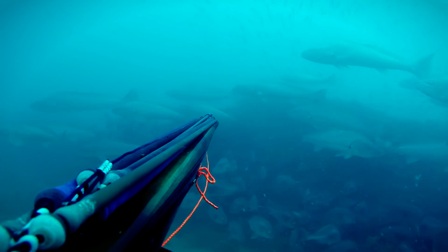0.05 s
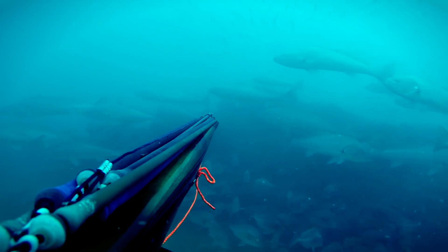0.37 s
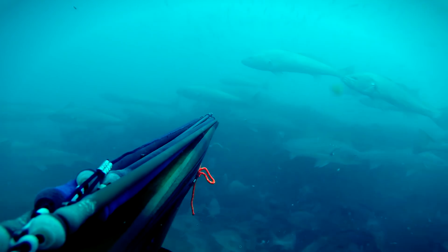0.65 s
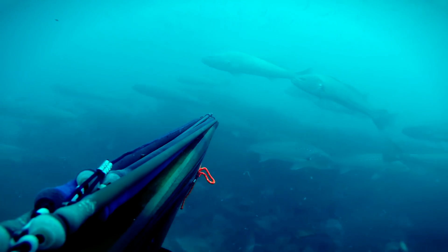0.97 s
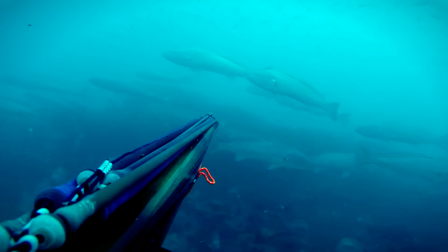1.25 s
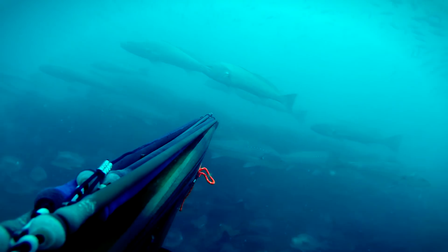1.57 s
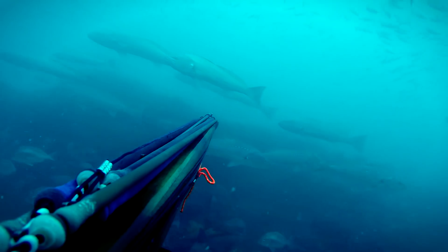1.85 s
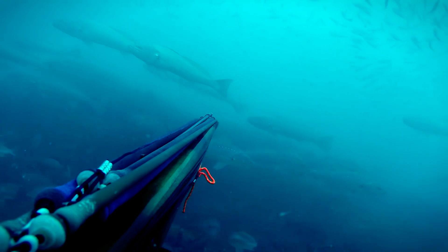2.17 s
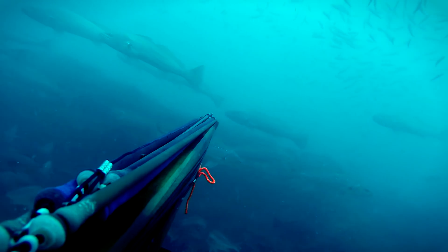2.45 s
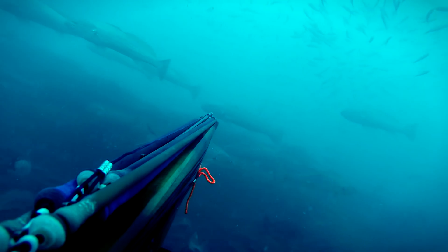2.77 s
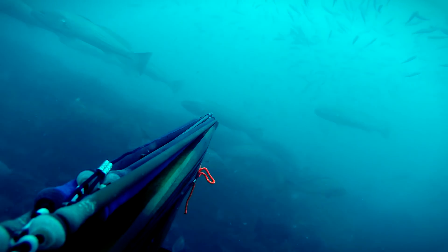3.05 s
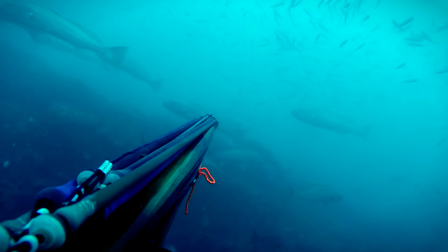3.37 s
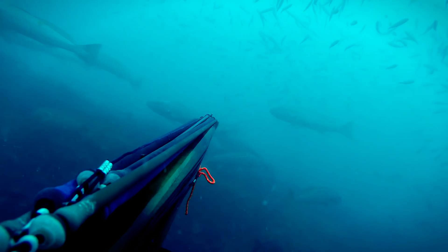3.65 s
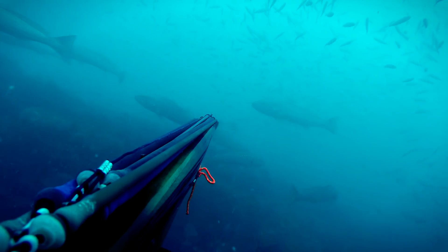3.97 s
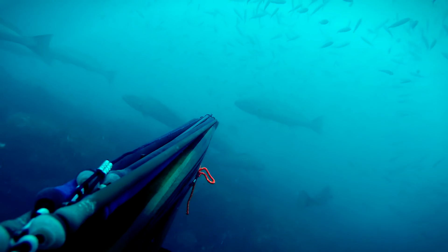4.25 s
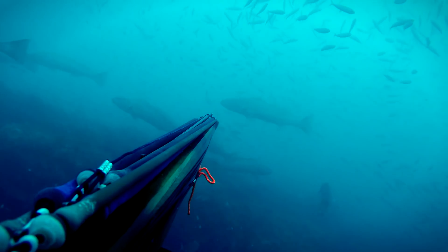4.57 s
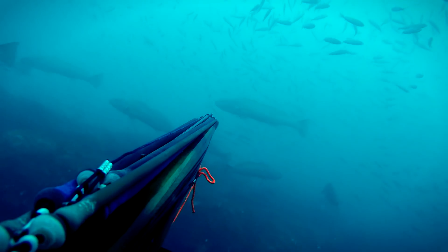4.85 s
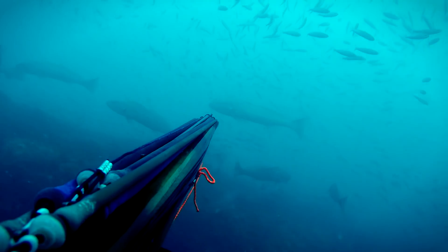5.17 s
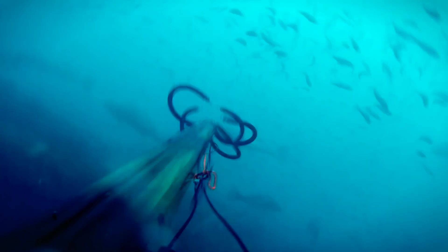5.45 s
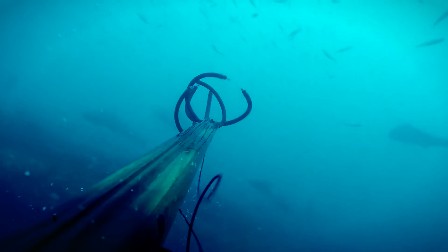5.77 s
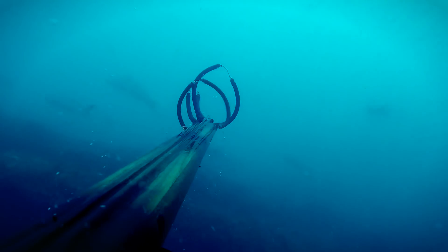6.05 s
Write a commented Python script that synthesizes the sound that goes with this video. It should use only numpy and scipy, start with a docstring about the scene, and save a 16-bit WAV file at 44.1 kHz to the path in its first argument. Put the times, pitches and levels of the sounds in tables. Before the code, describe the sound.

Faint underwater wash with tiny shrimp clicks, then a speargun fires with one loud crack and a brief rattle.

```python
"""Speargun shot under water

Heard from a camera housing on the gun: snapping shrimp crackle over a low wash; the gun knocks and
creaks in the hand. The trigger lets go, the rubber bands slam forward, the shaft rattles out and the
line snaps off its clip. The shot overloads the camera, whose gain control ducks and slowly recovers."""
import sys
import numpy as np
from scipy import signal
from scipy.fft import rfft, irfft
from scipy.io import wavfile
from scipy.ndimage import map_coordinates

SR = 44100
rng = np.random.default_rng(int(sys.argv[2]) if len(sys.argv) > 2 else 0)


def materialize(psi):
    """Save the field psi as 16-bit PCM at rate SR to the path in sys.argv[1].

    A 1-D psi becomes a single channel; in a 2-D psi each row is a channel.
    """
    bounded = np.clip(np.atleast_2d(psi).T, -1, 1)
    quanta = np.round(bounded * 32767).astype(np.int16)
    wavfile.write(sys.argv[1], SR, quanta)


N = 269451
LAUNCH_S, LAUNCH_RISE_S = 5.432, .012  # shaft starts to move; time to full speed

# spectra of water, distant shrimp, housing, gun contacts, shaft rush, rubber: f/Hz, relative level/dB
WASH_SPECTRUM = [(20, -3), (40, -1), (90, 0), (170, -1.5), (260, -7), (500, -12), (1000, -17.5),
                 (2500, -21.5), (5000, -30), (10000, -43.5), (15000, -34.5)]
REEF_SPECTRUM = [(600, -23.5), (1450, -8), (1850, 6), (2200, -13.5), (2900, -8.5), (3300, 2), (3850, -14.5),
                 (4500, -14), (5500, -6.5), (6400, -17.5), (7500, -9.5), (8500, -21), (9600, -15),
                 (15000, -29)]
HOUSING_SPECTRUM = [(600, -38), (1450, -10.5), (1850, 1.5), (2200, -8.5), (2900, -2), (3400, 6),
                    (3900, -6.5), (4500, -7), (5500, 1), (6400, -5.5), (7500, -1), (8500, -9), (9600, -8),
                    (13000, -13), (15500, -19)]
SCRAPE_SPECTRUM = [(150, -26), (450, -12.5), (800, -7.5), (1700, 5.5), (3400, 4.5), (4300, -10.5),
                   (5600, -2), (7400, -4), (8600, -17.5), (13000, -24), (16000, -29)]
RUSH_SPECTRUM = [(100, -13), (600, -7.5), (1200, -6), (2200, -5.5), (3300, -7), (4200, -17.5), (7000, -26),
                 (9000, -31.5), (16000, -41.5)]
RUBBER_SPECTRUM = [(15, -21), (45, -10.5), (62, 6.5), (76, -8.5), (90, 0), (125, -17), (200, -16),
                   (300, -20.5), (700, -40), (2000, -72.5)]
# nearest shrimp: t/s, housing ring/dB, crack/dB, sizzle/dB, t60/s
NEAR_SNAPS = [(0.0606, -40, -45, -52, 0.019), (0.1176, -52, -53, -57, 0.04), (0.172, -62, -56, -49, 0.006),
              (0.2952, -41, -44, -55, 0.033), (0.3298, -49, -43, -61, 0.017),
              (0.3379, -46, -49, -63, 0.025), (0.3538, -50, -49, -60, 0.022), (0.852, -31, -39, -46, 0.022),
              (0.9595, -47, -44, -45, 0.007), (0.9899, -48, -48, -55, 0.035), (1.049, -47, -46, -63, 0.006),
              (1.252, -62, -58, -55, 0.006), (1.9708, -54, -48, -63, 0.029), (2.382, -44, -51, -72, 0.006),
              (2.5341, -52, -40, -50, 0.006), (2.779, -44, -45, -56, 0.025), (2.8215, -32, -27, -35, 0.006),
              (3.1592, -43, -46, -56, 0.038), (3.1926, -49, -49, -56, 0.016),
              (3.3035, -44, -43, -55, 0.008), (3.4128, -41, -39, -52, 0.017),
              (3.5609, -47, -46, -48, 0.012), (3.712, -47, -43, -54, 0.031), (4.214, -48, -37, -45, 0.009),
              (4.3882, -51, -45, -64, 0.006), (4.7444, -48, -47, -64, 0.011),
              (4.7975, -46, -40, -45, 0.006), (4.847, -54, -47, -59, 0.006), (5.1178, -44, -44, -52, 0.034),
              (5.1886, -46, -49, -53, 0.016)]
# modes of steel and stock: f/Hz, relative level/dB, t60/s
GUN_MODES = [(839, -14.5, 0.37), (930, -11.5, .18), (1145, -12.5, .16), (1333, -7.5, 0.17), (1623, 7.5, .1),
             (1810, -1.5, 0.048), (2290, 2.5, 0.079), (2550, -13, .1), (3150, 6, 0.033), (3350, -3, 0.035),
             (3520, -4, 0.047)]
# grip creaks: t/s, length/s, level/dB
GRIP_CREAKS = [(1.491, .08, -44), (1.725, 0.12, -42)]
# bumps and recoil of the stock: t/s, level/dB, f/Hz, rise/s
STOCK_THUMPS = [(0.492, -33, 86.4, 0.019), (1.434, -43, 470, 0.0046), (1.742, -40, 80, 0.015),
                (2.773, -30.5, 124, 0.0032), (3.469, -35, 312, 0.0033), (5.432, -7, 178, 0.0058),
                (5.435, -14, 395, .003), (5.446, -13.5, 105, 0.0065), (5.467, -9, 52, 0.0079),
                (5.94, -36, 33, .04)]
# hum of the slack bands: f/Hz, level/dB
BAND_HUM = [(63, -27), (88, -24), (224, -27)]
# knocks in the hand while aiming: t/s, level/dB, f/Hz
HAND_KNOCKS = [(0.321, -29, 2530), (0.446, -32, 2550), (1.432, -20, 2485), (1.4371, -31.5, 1186),
               (2.093, -33, 1595), (4.545, -29.5, 2380)]
# trigger release, then bands hitting the muzzle: t/s, level/dB, f/Hz, rise/s, scrape/dB
SHOT_BLOWS = [(5.4154, 6, 1700, 0.00076, -25), (5.416, -3.5, 813, .0012, -36.5),
              (5.4182, 1, 1470, 0.00065, -41), (5.4289, -1.5, 2520, 0.0007, -13.5),
              (5.434, 18, 1572, 0.0018, -1.5), (5.4385, 17, 2103, .0014, -4), (5.445, -9.5, 2510, 0.003, 7)]
# shaft hitting its guide: t/s, level/dB, rise/s, scrape/dB
SHAFT_HITS = [(5.4648, 9, 0.00064, -9), (5.467, 8.5, .0012, -15), (5.472, -1, 0.0015, 7),
              (5.494, 2, 0.0012, -4), (5.5027, 9.5, .0012, -3), (5.5152, -3, 0.0014, 0),
              (5.5283, 2.5, 0.00051, -8), (5.538, -0.5, 0.00055, 1), (5.546, 5, 0.00076, -7),
              (5.5565, 1, .0006, -4), (5.559, -3.5, 0.003, 3), (5.610, -12, .0007, 11)]
# line jerking at its clip: t/s, level/dB, f/Hz, rise/s
LINE_TUGS = [(5.639, -4.5, 2490, 0.00047), (5.6543, -10, 2180, 0.00094), (5.670, -18.5, 2550, 0.0075),
             (5.678, -10, 2640, 0.00097), (5.6912, -3, 2380, .001), (5.6973, 1.5, 2630, 0.00088),
             (5.700, -3.5, 2430, 0.0013), (5.7084, 4.5, 2275, 0.0019), (5.7106, 10.5, 2750, 0.00089),
             (5.7516, -23, 2230, 0.001), (5.797, -28, 1810, 0.0032), (5.828, -26, 3370, 0.002)]


def amp(db):
    return 10 ** (np.asarray(db) / 20)


def unit_rms(x):
    return x / np.sqrt(np.mean(x ** 2) + 1e-20)


def unit_peak(x):
    return x / np.max(np.abs(x))


def wobble(rate_hz):
    """Smooth random curve, rate_hz knots a second."""
    knots = rng.standard_normal(int(N * rate_hz / SR) + 4)
    return map_coordinates(knots, [np.arange(N) * rate_hz / SR])


def coloured(x, spectrum, size=4096):
    """Minimum-phase filter; spectrum interpolated over log frequency."""
    hz, db = np.transpose(spectrum)
    bin_db = np.interp(np.log(np.fft.rfftfreq(size, 1 / SR) + 1), np.log(hz + 1), db)
    cepstrum = irfft(np.log(amp(bin_db)))
    cepstrum[1:size // 2] *= 2
    cepstrum[size // 2 + 1:] = 0
    return signal.fftconvolve(x, irfft(np.exp(rfft(cepstrum))))[:len(x)]


def noise(spectrum):
    return unit_rms(coloured(rng.standard_normal(N), spectrum))


def butter(x, hz, kind, order=4):
    return signal.sosfilt(signal.butter(order, hz, kind, fs=SR, output="sos"), x)


def swell(t, rise_s):
    """Envelope: 1 at rise_s, then decay."""
    return (t / rise_s * np.exp(1 - t / rise_s)) ** 1.07


def launch_envelope(hold_s, fall_db_per_s):
    """Ramp at launch, hold, decay."""
    t = np.arange(N) / SR - LAUNCH_S
    return np.clip(t / LAUNCH_RISE_S, 0, 1) * amp(-fall_db_per_s * np.maximum(t - hold_s, 0))


def add(track, at_s, sound):
    part = track[max(round(at_s * SR), 0):][:len(sound)]
    part += sound[:len(part)]


def whine(hz=13906, level_db=-69):
    """Thin steady tone of the camera electronics."""
    return amp(level_db) * unit_rms(np.sin(2 * np.pi * hz * np.arange(N) / SR + .15 * wobble(20)))


def water():
    """Low wash of water moving round the housing."""
    return amp(-47.5 + 0.67 * wobble(7.6)) * noise(WASH_SPECTRUM)


def bubble_collapse(t, spike, t60_s, reef_db, uneven_db=3.5, reef_t60_s=0.061):
    """One snap: a spike, quick uneven echoes, a faint return from the reef."""
    lumps = amp(uneven_db * np.interp(t * 900, np.arange(64), rng.standard_normal(64)))
    decay = amp(-60 * t / t60_s) + amp(reef_db - 60 * t / reef_t60_s)
    echoes = lumps * rng.standard_normal(len(t)) * decay
    return spike * (t == 0) + echoes


def far_shrimp(count=520, spread_db=6.5, cap_db=11, tick_db=-46, sizzle_db=-56.5):
    """Random ticks, each with one broad resonance; the farthest merge into an even sizzle."""
    ticks, t = np.zeros(N), np.arange(SR // 40) / SR
    for when, size, colour, length in rng.random((count, 4)):
        snap = bubble_collapse(t, spike=1.4, t60_s=.006 + 0.013 * length, reef_db=-32.5)
        resonance = signal.iirpeak(3300 + 7500 * colour, Q=1.3, fs=SR)
        tick = unit_peak(signal.lfilter(*resonance, snap))
        db = min(-spread_db * np.log(size), cap_db)
        add(ticks, when * N / SR, amp(db) * tick)
    sizzle = amp(sizzle_db + 0.74 * wobble(3.6)) * noise(REEF_SPECTRUM)
    return amp(tick_db) * coloured(ticks, HOUSING_SPECTRUM) + sizzle


def near_shrimp(rms_window_s=.01):
    """Single claw snaps in three bands: housing ring, bright crack, sizzle."""
    out, t = np.zeros(N), np.arange(SR // 16) / SR
    for at_s, ring_db, crack_db, sizzle_db, t60_s in NEAR_SNAPS:
        snap = coloured(bubble_collapse(t, spike=3.0, t60_s=t60_s, reef_db=-21), HOUSING_SPECTRUM)
        low_hz = np.clip(2600 * (.006 / t60_s) ** .52, 1000, 3000)  # longer snap, more body
        ring = butter(snap, [low_hz, 3850], "band", order=3)
        crack = butter(snap, [4000, 8400], "band")
        sizzle = butter(snap, 8720, "high", order=6)
        for part, db in (ring, ring_db), (crack, crack_db), (sizzle, sizzle_db):
            add(out, at_s, amp(db) * part * np.sqrt(rms_window_s * SR) / np.linalg.norm(part))
    return out


def contact(hz, rise_s, scrape_db, chatter_rad=0.67, chatter_hz=1300, ring_db=-37):
    """Water-damped knock: a note smeared by chatter, a scrape, a faint ring of the gun."""
    t = np.arange(SR // 5) / SR
    chatter = chatter_rad * map_coordinates(rng.standard_normal(len(t)), [t * chatter_hz])
    note = swell(t, rise_s) * np.sin(2 * np.pi * hz * t + chatter)
    scrape = swell(t, 0.89 * rise_s) * unit_rms(coloured(rng.standard_normal(len(t)), SCRAPE_SPECTRUM))
    ring = sum(amp(db + rng.normal(0, 2.4) - 60 * t / t60_s) * np.sin(2 * np.pi * mode_hz * t)
               for mode_hz, db, t60_s in GUN_MODES)
    return unit_peak(note + amp(scrape_db) * scrape) + amp(ring_db) * ring


def grip(slip_s=0.02, spread_db=3.5):
    """Stick-slip creaks in short, uneven runs."""
    out = np.zeros(N)
    for start_s, length_s, db in GRIP_CREAKS:
        for at_s in np.arange(start_s, start_s + length_s, slip_s):
            gain = amp(db + rng.normal(0, spread_db))
            slip = contact(hz=2430, rise_s=0.0027, scrape_db=-7, chatter_rad=0.59)
            add(out, at_s + slip_s * rng.random(), gain * slip)
    return out


def stock():
    """The heavy stock shoves the housing for a few slow cycles."""
    out, t = np.zeros(N), np.arange(SR // 3) / SR
    for at_s, db, hz, rise_s in STOCK_THUMPS:
        add(out, at_s, -amp(db) * swell(t, rise_s) * np.sin(2 * np.pi * hz * t))
    return out


def rubber_bands(flap_db=-22.0, waver_rad=0.56):
    """The released bands flap and hum."""
    t = np.arange(N) / SR
    hum = sum(amp(db) * np.sin(2 * np.pi * hz * t + waver_rad * wobble(18)) for hz, db in BAND_HUM)
    flap = amp(flap_db) * noise(RUBBER_SPECTRUM)
    return launch_envelope(hold_s=0.15, fall_db_per_s=80) * (flap + hum)


def rush(rush_db=-19.3, wake_db=-43.5, grit_db=4):
    """Shaft and line tear through the water and leave a faint, lasting wake."""
    surge = amp(rush_db) * launch_envelope(hold_s=.085, fall_db_per_s=170)
    wake = amp(wake_db) * launch_envelope(hold_s=0.28, fall_db_per_s=19)
    grit = amp(grit_db * wobble(300))
    return (surge + wake) * unit_rms(noise(RUSH_SPECTRUM) * grit)


def shaft_grazes(count=13, gap_s=.0135, first_db=-11.0, fall_db_per_s=36, spread_db=3):
    """The shaft brushes its guide at uneven moments, fading as it leaves."""
    out = np.zeros(N)
    for k, (jitter, size, colour) in enumerate(rng.random((count, 3))):
        delay_s = (k + jitter) * gap_s
        db = first_db - fall_db_per_s * delay_s + spread_db * (2 * size - 1)
        graze = contact(hz=1850 + 800 * colour, rise_s=.0013, scrape_db=1)
        add(out, LAUNCH_S + delay_s, amp(db) * graze)
    return out


def line(band_hz=(1100, 12500)):
    """Thin ticks as the line jerks and pulls free of its clip."""
    out = np.zeros(N)
    for at_s, db, hz, rise_s in LINE_TUGS:
        add(out, at_s, amp(db) * contact(hz, rise_s, scrape_db=-13.0))
    return butter(out, band_hz, "band", order=2)


def gun(highpass_hz=330):
    """Contacts on the gun: soft hand knocks, blows of trigger and bands, shaft rattle."""
    out = np.zeros(N)
    for at_s, db, hz in HAND_KNOCKS:
        add(out, at_s, amp(db) * contact(hz, rise_s=0.002, scrape_db=-4.5))
    for at_s, db, hz, rise_s, scrape_db in SHOT_BLOWS:
        add(out, at_s, amp(db) * contact(hz, rise_s, scrape_db))
    for at_s, db, rise_s, scrape_db in SHAFT_HITS:
        add(out, at_s, amp(db) * contact(hz=2230, rise_s=rise_s, scrape_db=scrape_db))
    return butter(out, highpass_hz, "high", order=2)


def scene():
    """Sum at the one microphone in the housing."""
    background = whine() + water() + far_shrimp() + near_shrimp()
    speargun = grip() + stock() + rubber_bands() + rush() + shaft_grazes() + line() + gun()
    return (background + speargun)[None]


def smooth(x, tau_s):
    pole = np.exp(-1 / (tau_s * SR))
    return signal.lfilter([1 - pole], [1, -pole], x)


def record(dry, threshold_db=-20, depth_db=11.5, recover_db_per_s=5, attack_s=0.016, lowpass_hz=15400):
    """Camera: gain control ducks on loud sound and creeps back; what it misses is clipped."""
    x, t = dry[0], np.arange(N) / SR
    level_db = 10 * np.log10(smooth(x ** 2, tau_s=0.0046) + 1e-12)
    excess_db = np.clip(level_db - threshold_db, 0, depth_db)
    duck_db = np.maximum.accumulate(excess_db + recover_db_per_s * t) - recover_db_per_s * t
    clipped = np.clip(x * amp(-smooth(duck_db, attack_s)), -1, 1)
    return butter(clipped, lowpass_hz, "low", order=16)[None]


dry = scene()
out = record(dry)
materialize(out)
```